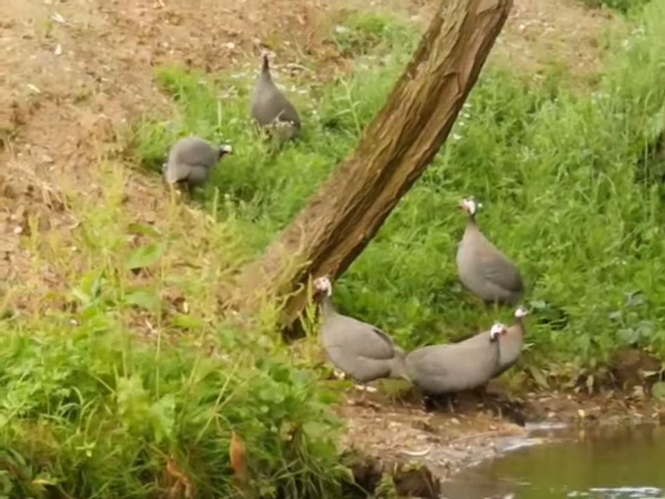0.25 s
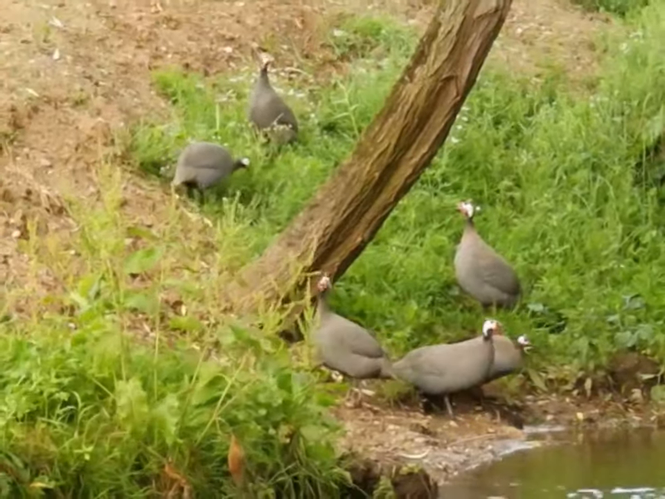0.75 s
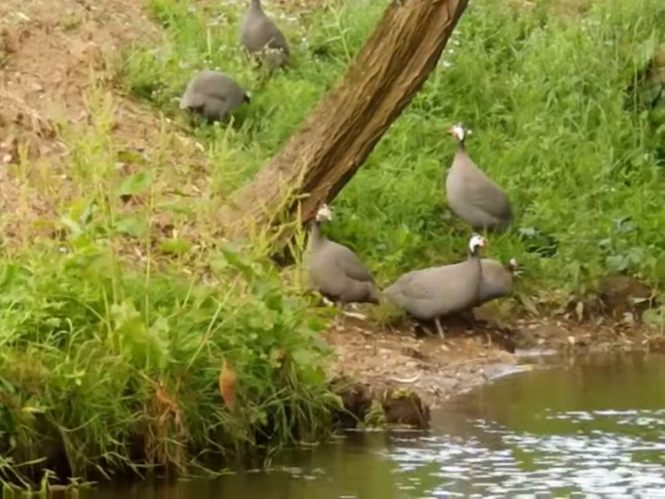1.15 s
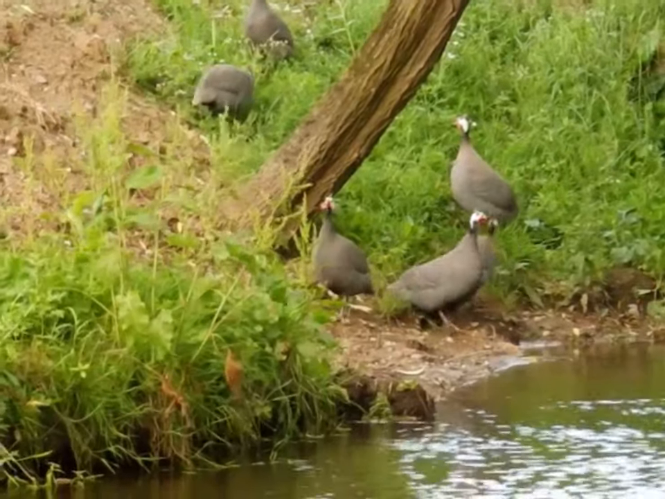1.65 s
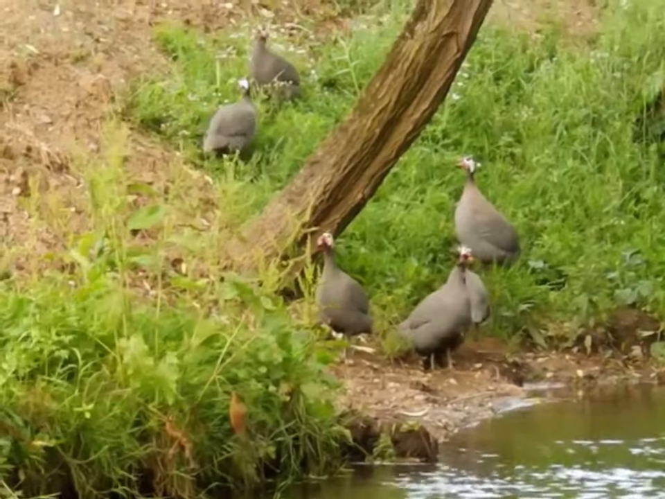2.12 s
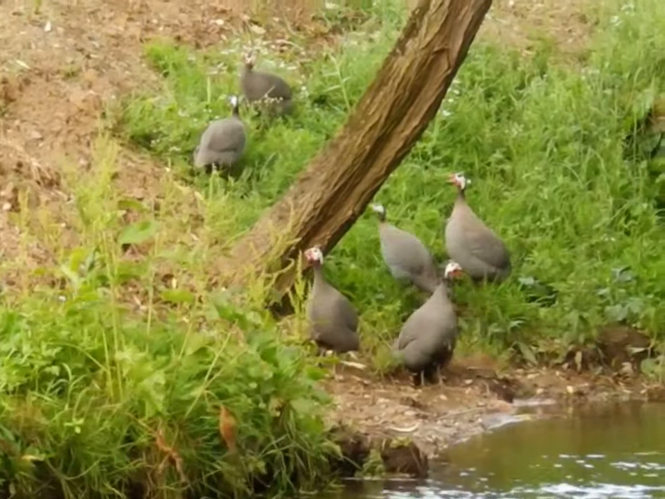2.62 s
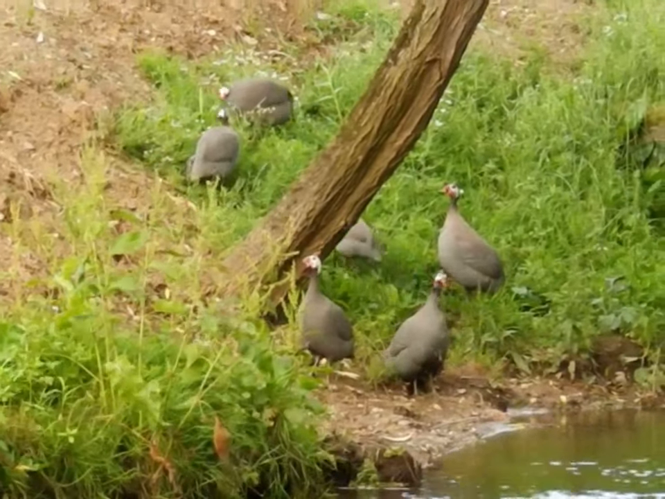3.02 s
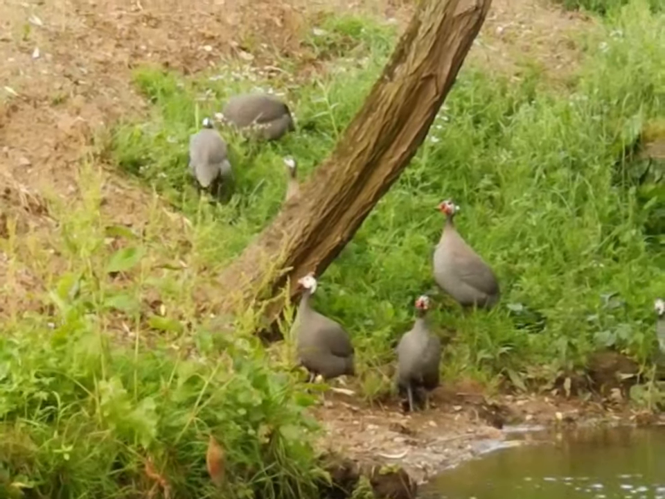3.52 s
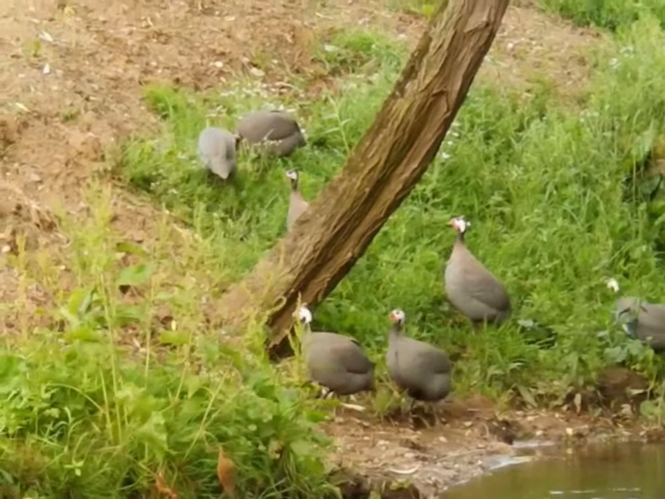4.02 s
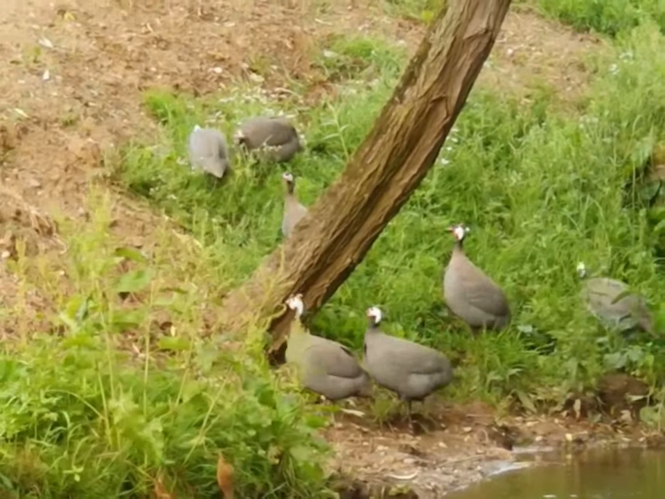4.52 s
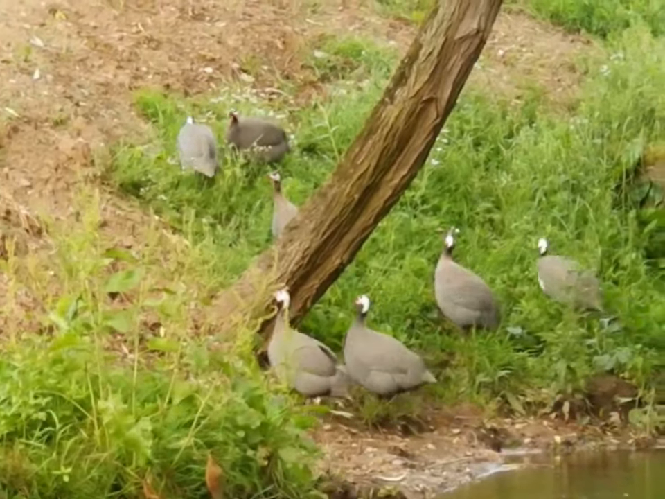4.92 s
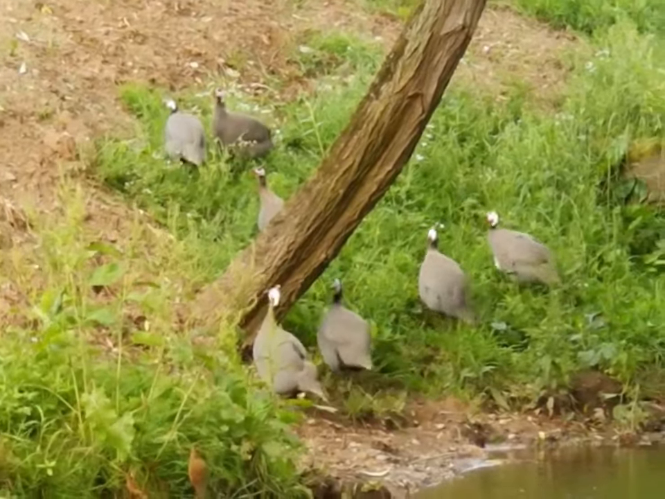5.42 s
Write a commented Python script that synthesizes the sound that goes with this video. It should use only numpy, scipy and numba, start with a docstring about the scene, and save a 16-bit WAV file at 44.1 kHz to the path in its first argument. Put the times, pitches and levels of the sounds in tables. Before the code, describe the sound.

Outdoors on a grassy riverbank, guineafowl give a few short, rasping squawks while one bird builds a rapid, buzzing rattle. The rattle stops near the three-second mark, leaving scattered small clucks and faint far-off bird whistles. Water rushes softly throughout, and wind rumbles on the microphone, with its heaviest thumps just after the rattle. The flock is heard from across the water, with slight scatter from bank and trees.

```python
"""Harsh squawks from a flock of guineafowl on a grassy far bank, then a fast rattle from one bird; clucks are scattered throughout.
Each voice is an uneven membrane flutter, a high reedy tone or both, ringing in throat and beak; bank and trees scatter it.
A small bird whistles far off, as slurred tones, and there is one faint tick.
Behind them the river rushes softly, as noise with flickering bands, and wind rumbles and thumps on the microphone."""
import sys
import numpy as np
from scipy import signal
from scipy.fft import rfft, irfft
from scipy.io import wavfile
from numba import njit

SR = 44100
rng = np.random.default_rng(int(sys.argv[2]) if len(sys.argv) > 2 else 0)


def output_pcm(signal):
    """Save a mono or channel-first signal as 16-bit PCM at the path in sys.argv[1].

    Samples are clipped to [-1, 1] before scaling.
    """
    pcm = np.clip(np.atleast_2d(signal).T, -1, 1) * 32767
    wavfile.write(sys.argv[1], SR, np.round(pcm).astype(np.int16))


N = 249606
TIME = np.arange(N) / SR  # seconds


# Squawks across the water. Each row: start in seconds, length in seconds.
SQUAWKS = [(0.088, 0.12), (0.38, 0.11), (0.655, 0.1), (1.427, .088)]
# Resonances of the wide-open throat and beak. Each row: centre in Hz, width in Hz, level in dB.
GAPE = [(1304, 42, -1), (1624, 150, -4.5), (2072, 91, -1), (2640, 230, 2), (3226, 105, 0.5), (3875, 140, 4),
        (4550, 120, 3), (5420, 940, -6)]
SQUAWK_DB, SQUAWK_FLUTTER_HZ = -23.5, 413.3
SQUAWK_SAG = .1  # share of the flutter rate lost as the breath runs out, mostly at the very end
CRY_TOP_HZ, CRY_FALL_HZ = 2150, 570  # the fall is reckoned 0.75 of a squawk's length past the top


def squawks():
    """A hard, rasping onset; as it relaxes, a sharp throat resonance slides down across the flutter's harmonics."""
    out = np.zeros(N)
    for start_s, length_s in SQUAWKS:
        u = np.linspace(0, 1, int(length_s * SR))  # progress through the squawk
        swell = np.clip(u / .22, 0, 1) * np.clip((1 - u) / .1, 0, 1)
        push = undb(-16 * np.maximum(u - .25, 0))
        flutter_hz = SQUAWK_FLUTTER_HZ * (1 - SQUAWK_SAG * u ** 3)
        pulses, opening = flutter(flutter_hz, jitter=.06, scatter_db=1.3, breath=.3)
        # turbulence rides on the pulses while the push is hard
        source = pulses + 1.5 * push * np.sqrt(opening) * hiss(len(u))
        # the membranes can only swing so far, which packs the rasp densely
        rasp = unit(np.tanh(.5 * unit(tract(source, GAPE))))
        treble = resonate(resonate(source, 15000, 11000), 15000, 11000)
        bite = undb(-16) * unit(treble) * np.sqrt(push)
        # the throat resonance arches, then falls ever faster
        centre_hz = CRY_TOP_HZ - CRY_FALL_HZ * ((u - .3) / 0.75) ** 2
        ringing = sweep(sweep(pulses, centre_hz, 550.), centre_hz, 900.)
        cry = undb(-5.5) * unit(ringing) * (.5 + .35 * u)
        add(out, start_s, undb(SQUAWK_DB) * swell * ((rasp + bite) * push + cry))
    return out


# Rattle notes of one bird. Each row: peak in seconds, rise in seconds, fall in seconds,
# level in dB of the beak sound at the bird.
RATTLE = [(0.858, .025, 0.021, -35.5), (0.997, .011, .027, -26.5), (1.121, .012, .019, -28),
          (1.223, .0063, .024, -30), (1.338, .008, 0.039, -27.5), (1.552, 0.012, 0.02, -33.5),
          (1.648, .013, .024, -28), (1.741, 0.0058, 0.017, -24.5), (1.846, 0.0085, .012, -25.5),
          (1.944, 0.007, 0.02, -26), (2.046, 0.0066, 0.015, -25.5), (2.152, .007, 0.0087, -24.5),
          (2.27, .014, 0.0126, -28), (2.376, 0.0074, .016, -25.5), (2.494, .009, .019, -25.5),
          (2.606, 0.0075, .024, -25), (2.727, 0.0086, .015, -24), (2.889, .007, .023, -25)]
# How the rattle heats up and dies down. Each row: time in seconds, excitement 0-1, throat relative to beak in dB,
# level of the reedy tone in dB, its starting pitch in Hz.
FERVOUR = [(0.858, 0.1, -9, -33, 1366), (1.111, 0.12, -3, -32.5, 1174), (1.23, 0.69, -2, -26, 1388),
           (1.351, 0.74, -2, -28.5, 1328), (1.56, .85, -0.5, -38.5, 1150), (1.739, 1., -4, -32, 1239),
           (2.1, .8, -7.5, -51, 1305), (2.5, 0.97, -5, -56, 1300), (2.73, .75, -5.5, -40, 1350),
           (2.89, 0, -12, -35, 1405)]
# Throat resonances below the beak's. Each row: centre in Hz, width in Hz, level in dB.
THROAT = [(280, 123, -14), (1400, 120, -5), (1680, 95, 0), (1870, 140, -0.5), (2318, 82, 3.5),
          (2750, 240, -1)]
CALM_FLUTTER_HZ, EXCITED_FLUTTER_HZ = 293, 333.2  # before the effort scales it by 0.88 to 1.01
CALM_BEAK_HZ, EXCITED_BEAK_HZ = 3470, 3910  # at the peak of a note
CALM_BITE_DB, EXCITED_BITE_DB = -33, -6  # treble bite, relative to the beak
CALM_CLOSING_OCT_PER_S, EXCITED_CLOSING_OCT_PER_S = 10.8, 3.3  # fall of the beak resonance within a note
REED_FALL, REED_BEAK_HZ, REED_ROUGH = .14, 2740, 0.45  # the tone loses this share of its pitch within a note
# the tone starts this many rise times before the peak and lasts this many times rise plus fall
REED_LEAD, REED_STRETCH = 1.5, 1.9


def rattle():
    """Short buzzing notes over a falling reedy tone; excitement makes them faster-fluttering, higher and more biting."""
    out = np.zeros(N)
    t = np.arange(-SR // 12, SR // 10) / SR  # seconds from the peak
    times, *controls = np.transpose(FERVOUR)
    for peak_s, rise_s, fall_s, db in RATTLE:
        excitement, throat_db, reed_db, reed_hz = (np.interp(peak_s, times, control) for control in controls)
        flutter_hz = blend(CALM_FLUTTER_HZ, EXCITED_FLUTTER_HZ, excitement)
        beak_hz = blend(CALM_BEAK_HZ, EXCITED_BEAK_HZ, excitement)
        bite_db = blend(CALM_BITE_DB, EXCITED_BITE_DB, excitement)
        closing = blend(CALM_CLOSING_OCT_PER_S, EXCITED_CLOSING_OCT_PER_S, excitement)
        # flutter rate arches with the effort, the beak closes, and the throat sounds longest
        effort = np.exp(-.5 * (t / np.where(t < 0, rise_s, fall_s)) ** 2)
        pulses, _ = flutter(flutter_hz * (.88 + .13 * effort), jitter=.05, scatter_db=1.2, breath=.6)
        centre_hz = beak_hz * 2 ** (-closing * np.clip(t, -.015, .035))
        beak = unit(sweep(sweep(pulses, centre_hz, 800.), centre_hz, 2000.))
        # a weaker resonance moves along above the main one
        upper = sweep(sweep(pulses, 1.208 * centre_hz, 470.0), 1.2 * centre_hz, 1200.0)
        beak = unit(beak + undb(-13.0) * unit(upper))
        throat = undb(throat_db) * unit(tract(pulses, THROAT))
        bite = undb(bite_db) * unit(resonate(resonate(pulses, 12800, 6900), 12500, 6900))
        note = (beak + bite) * effort + throat * effort ** 0.45
        add(out, peak_s + t[0], undb(db) * note)
        tone_s = REED_STRETCH * (rise_s + fall_s)
        tone = cluck(tone_s, reed_hz, reed_hz * (1 - REED_FALL), REED_BEAK_HZ, REED_ROUGH)
        add(out, peak_s - REED_LEAD * rise_s, undb(reed_db) * tone)
    return out


# Clucks around the flock. Each row: start in seconds, length in seconds, level in dB before its swell,
# pitch at start in Hz, pitch at end in Hz, beak resonance in Hz, roughness 0-1.
CLUCKS = [(0.312, .035, -26.5, 1370, 1260, 3440, 0.42), (0.502, 0.035, -28.5, 1328, 1186, 3500, 0.28),
          (1.353, .075, -34, 1445, 1490, 2660, 0), (1.942, 0.038, -25.5, 1522, 1582, 2680, 0.5),
          (2.245, 0.052, -33.5, 1374, 1660, 2070, 0.41), (2.642, .048, -38.5, 1410, 1680, 1900, 0),
          (3.096, 0.034, -31, 877, 1201, 2600, 0.67), (3.274, 0.05, -35, 1134, 1148, 2920, 0.25),
          (3.563, 0.042, -33.5, 1355, 1510, 2450, 0.84), (3.711, 0.026, -44, 977, 1027, 2900, .4),
          (3.991, 0.028, -30.5, 1422, 1596, 2830, .6), (4.078, 0.032, -42.5, 1278, 1177, 2600, 0.33),
          (4.529, .049, -39, 1014, 1205, 3950, 0.6), (5.16, 0.037, -40, 973, 1088, 4040, .3),
          (5.203, 0.059, -36.5, 1507, 1670, 3900, 0.38), (5.647, 0.045, -29.5, 1416, 1440, 3960, 0.54)]


def clucks():
    """Single clucks from the other birds, among the squawks, through the rattle and after it."""
    out = np.zeros(N)
    for start_s, length_s, db, first_hz, last_hz, beak_hz, rough in CLUCKS:
        add(out, start_s, undb(db) * cluck(length_s, first_hz, last_hz, beak_hz, rough))
    return out


def cluck(length_s, first_hz, last_hz, beak_hz, rough):
    """One brief gliding reedy note; the rougher it is, the more the flutter chops it."""
    u = np.linspace(0, 1, int(length_s * SR))
    rough = np.clip(rough, 0, 1)
    pulses, opening = flutter(np.full(len(u), 310.), jitter=0.094, scatter_db=2.0, breath=1.0)
    tone = reed(first_hz + (last_hz - first_hz) * u, rough, tilt_db=-3.0, count=4)
    voice = tone * (1 - rough + rough * opening) + 1.14 * rough * pulses
    # beak, less a narrow throat resonance
    voice = resonate(voice, beak_hz, 2060) - 0.19 * resonate(voice, 1360, 220)
    return unit(voice) * np.abs(np.sin(np.pi * u ** 0.86))


def flutter(hz, jitter, scatter_db, breath):
    """A membrane slapping shut unevenly: returns its pulses with a puff of air after each, and its opening."""
    n = len(hz)
    cycles = np.cumsum(hz * np.exp(jitter * walk(n, 300))) / SR
    count = cycles.astype(int)
    size = undb(scatter_db * rng.standard_normal(512))[count]  # one strength per cycle
    opening = unit(size * np.exp(-(cycles % 1) / .35))
    slaps = unit(size * np.diff(count, prepend=0))
    return slaps + breath * opening * hiss(n), opening


def reed(hz, rough, tilt_db=-3., waver=0.0534, count=7):
    """The fast membrane: a stack of harmonics whose pitch shakes with roughness."""
    shaken_hz = hz * (1 + waver * rough * walk(len(hz), 685.0))
    phase = 2 * np.pi * np.cumsum(shaken_hz) / SR
    return unit(sum(undb(tilt_db * k) * np.sin((k + 1) * phase) for k in range(count)))


def blend(calm, excited, excitement):
    """A value between its calm and its excited extreme."""
    return calm + excitement * (excited - calm)


def bank(x, near_db=-9, near_s=0.015, far_db=-12, far_t60_s=0.66):
    """Quick scatter from ground and grass, then a thin tail from the trees."""
    t = TIME[:SR]
    near = unit(rng.standard_normal(SR) * np.exp(-t / near_s) * (t > .002))
    far = rng.standard_normal(SR) * undb(-60 * t / far_t60_s) * (1 - np.exp(-t / 0.003))
    far = unit(colour(far, [(300, -12), (1500, 0.0), (4500, -1), (7000, 5.5), (14000, -31)]))
    scatter = undb(near_db) * near + undb(far_db) * far
    return x + signal.fftconvolve(x, scatter)[:N] / np.sqrt(SR)


def lingering(db=-43, t60_s=0.5):
    """The echo of an earlier squawk, still dying away among the trees: fading noise in the squawk's resonances."""
    echo = colour(tract(rng.standard_normal(N), GAPE), CARRY)
    return undb(db - 60 * TIME / t60_s) * unit(echo)


# Chirps from far off. Each row: start in seconds, level in dB before its swell.
CHIRPS = [(3.047, -51), (3.242, -47), (3.508, -54), (4.22, -53.5), (4.95, -59)]


def chirps(first_hz=4700, last_hz=3800, length_s=0.071):
    """A small bird far off whistles short downward slurs, each a single shaky tone."""
    out = np.zeros(N)
    u = np.linspace(0, 1, int(length_s * SR))
    for start_s, db in CHIRPS:
        whistle = reed(first_hz + (last_hz - first_hz) * u, rough=.6, count=1)
        add(out, start_s, undb(db) * np.sin(np.pi * u) * whistle)
    return out


def tick(start_s=5.142, db=-34, decay_s=0.008):
    """One faint dry tick: a burst of noise through two broad resonances, dying at once."""
    out, t = np.zeros(N), TIME[:SR // 20]
    knock = resonate(resonate(hiss(len(t)), 880, 1300), 1300, 4300)
    add(out, start_s, undb(db) * unit(knock) * np.exp(-t / decay_s))
    return out


# Spectrum of the running water. Each row: frequency in Hz, density in dB per Hz, relative.
RIVER = [(120, -18), (200, -6), (430, -7), (992, -9.5), (1070, -9), (1780, -16), (2420, -15.5), (3610, -19),
         (3960, -20), (5490, -20.5), (7090, -33), (15500, -33.5)]
RIVER_DB = -46.5


def river():
    """Running water: a soft rush whose bands flicker with the ripples."""
    rush = colour(rng.standard_normal(N), RIVER)
    ripples = np.zeros(N)
    for hz in np.geomspace(400, 3200, 4):
        ripples += resonate(rush, hz, hz / 2) * .13 * walk(N, 30)
    return undb(RIVER_DB) * unit(rush + ripples)


# Steady wind at the microphone, the reference for rumble and small eddies. Each row: time in seconds, level in dB.
BREEZE = [(0.0, -57), (0.12, -37), (0.25, -43.5), (0.68, -50.5), (0.88, -56), (1.06, -45.5), (1.34, -47),
          (1.72, -38.5), (2.27, -49), (3.03, -37), (3.12, -32.5), (3.33, -34.5), (3.96, -40.5), (5.66, -46)]
# Spectrum of the steady wind. Each row: frequency in Hz, level in dB.
RUMBLE = [(10, -20), (28, 0), (70, -1.5), (130, -6.5), (220, -14), (400, -20), (1000, -52), (3000, -78)]
# The strongest buffets on the microphone. Each row: peak in seconds, half length in seconds, level in dB.
BUFFETS = [(0.152, 0.013, -22.5), (0.185, 0.0054, -24), (0.398, 0.012, -29), (0.918, 0.02, -30.5),
           (1.579, 0.018, -26), (1.658, 0.0091, -26), (2.972, 0.0057, -23), (3.126, 0.021, -26.5),
           (3.262, 0.026, -21.5), (3.311, 0.016, -17.5), (3.441, 0.015, -11), (3.518, 0.0079, -14.5),
           (3.689, .01, -23.5), (4.703, 0.033, -30.5)]
# Spectrum of one eddy. Each row: multiple of its centre frequency, level in dB.
EDDY = [(.15, -21.5), (.55, 1.5), (1.1, -2), (1.6, -8.5), (2.6, -19), (4, -40.5), (12, -88)]
EDDY_TOP_HZ, EDDY_OCT_PER_DB = 178.4, 0.05  # centre of an eddy at 0 dB; weaker ones are lower
SMALL_EDDIES_PER_S, SMALL_EDDY_HALF_S = 5, 0.011
RUMBLE_DB, SMALL_EDDY_DB, SMALL_EDDY_SCATTER_DB = 1.5, 6, 1.3  # levels relative to the breeze


def wind():
    """A low rumble on the microphone; strong buffets and a scatter of small eddies thump against it."""
    breeze_db = np.interp(TIME, *np.transpose(BREEZE))
    rumble = colour(rng.standard_normal(N), RUMBLE)
    out = unit(rumble) * undb(breeze_db + RUMBLE_DB + 2.9 * walk(N, 11))
    small = []
    for i in rng.integers(0, N, int(SMALL_EDDIES_PER_S * N / SR)):
        db = breeze_db[i] + SMALL_EDDY_DB + SMALL_EDDY_SCATTER_DB * rng.standard_normal()
        small.append((TIME[i], SMALL_EDDY_HALF_S, db))
    t = np.arange(-SR // 10, SR // 10) / SR  # seconds from the peak
    for peak_s, half_s, db in BUFFETS + small:
        swell = np.exp(-.5 * (t / half_s) ** 2)
        # stronger eddies carry the same shape of spectrum higher up
        hz = EDDY_TOP_HZ * 2 ** (EDDY_OCT_PER_DB * db)
        eddy = colour(hiss(len(t)), [(hz * ratio, gain_db) for ratio, gain_db in EDDY])
        thump = unit(eddy * swell) * np.sqrt(np.mean(swell ** 2))
        add(out, peak_s + t[0], undb(db) * thump)
    return out


def undb(db):
    """Decibels to gain."""
    return 10 ** (np.asarray(db) / 20)


def unit(x):
    """Scale to rms 1."""
    return x / np.sqrt(np.mean(x ** 2) + 1e-18)


def add(out, start_s, x):
    """Mix a sound in at a time."""
    i = max(int(start_s * SR), 0)
    out[i:i + len(x)] += x[:max(N - i, 0)]


def resonate(x, hz, width_hz):
    """One resonance with gain 1 at its centre."""
    return signal.lfilter(*signal.iirpeak(hz, hz / width_hz, fs=SR), x)


def tract(x, modes):
    """Parallel resonances of alternating sign, as along a tube."""
    return sum((-1) ** k * undb(db) * resonate(x, hz, width) for k, (hz, width, db) in enumerate(modes))


@njit
def sweep(x, hz, width_hz):
    """State-variable band-pass whose centre moves every sample."""
    y, band, low = np.empty(len(x)), 0., 0.
    for i in range(len(x)):
        g, k = np.tan(np.pi * hz[i] / SR), width_hz / hz[i]
        v = (band + g * (x[i] - low)) / (1 + g * (g + k))
        band, low, y[i] = 2 * v - band, low + 2 * g * v, k * v
    return y


def colour(x, points):
    """Filter by a curve of (Hz, dB) points, joined along log frequency."""
    hz, db = np.transpose(points)
    f = np.maximum(np.fft.rfftfreq(len(x), 1 / SR), 1)
    return irfft(rfft(x) * undb(np.interp(np.log(f), np.log(hz), db)), len(x))


def walk(n, rate):
    """Random wander with a spread near 1, through `rate` new values a second."""
    return np.interp(np.arange(n) * rate / SR, np.arange(4096), rng.standard_normal(4096))


def hiss(n):
    """White noise for one short sound."""
    return rng.standard_normal(SR // 2)[:n]


# How the flock's sound radiates and carries over the water. Each row: frequency in Hz, gain in dB.
CARRY = [(150, 0), (310, 7), (480, 1), (800, 3), (1250, -0.5), (3000, -2), (4700, 2.5), (5600, -3),
         (6500, -8.5), (7000, -14), (9300, -9.5), (12000, -18.5), (15500, -25)]


def scene():
    """The flock on the far bank, with the far bird, river and wind."""
    flock = colour(rattle() + squawks() + clucks(), CARRY)
    birds = bank(flock + chirps()) + lingering()
    return (birds + tick() + river() + wind())[None]


def record(dry, top_hz=15750):
    """The recorder cuts the top with a steep low-pass."""
    return signal.sosfilt(signal.ellip(10, .2, 80, top_hz, fs=SR, output="sos"), dry)


dry = scene()
out = record(dry)
output_pcm(out)
```